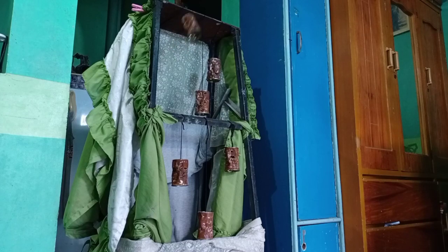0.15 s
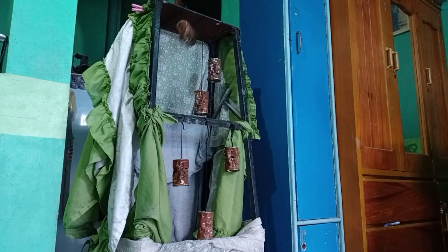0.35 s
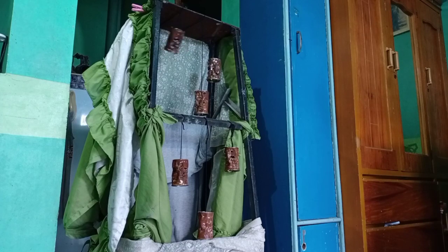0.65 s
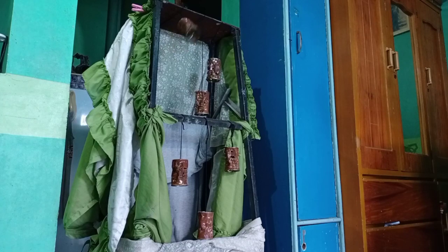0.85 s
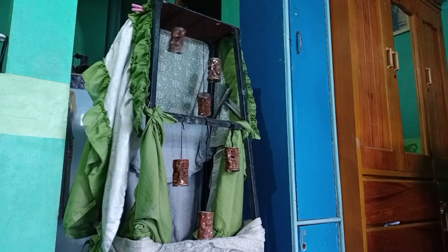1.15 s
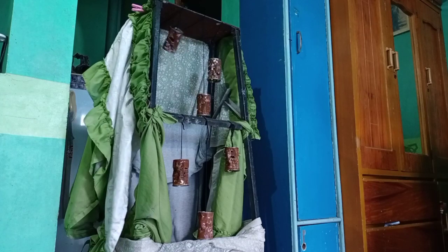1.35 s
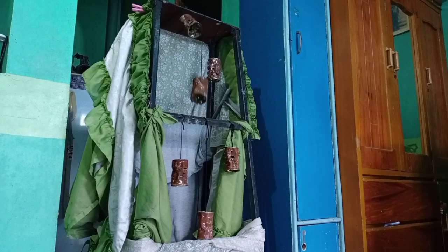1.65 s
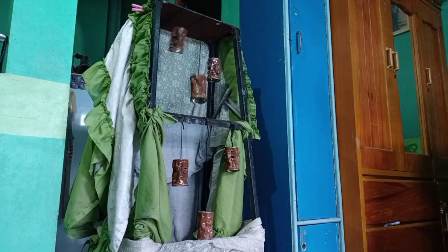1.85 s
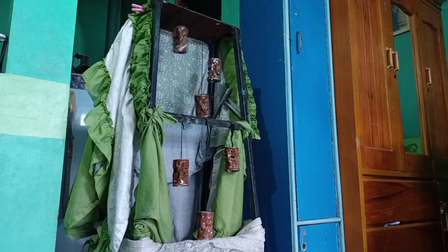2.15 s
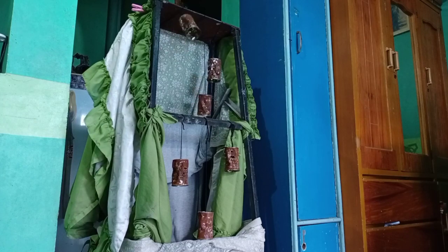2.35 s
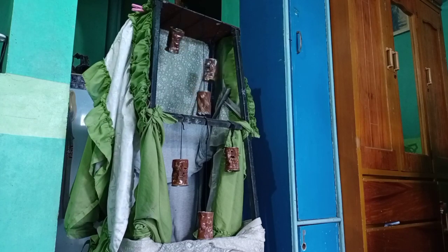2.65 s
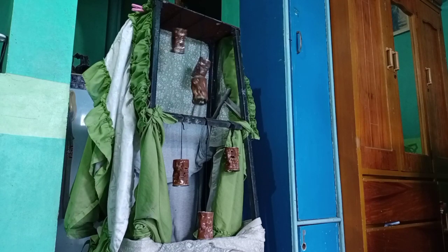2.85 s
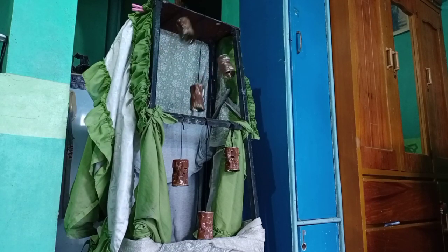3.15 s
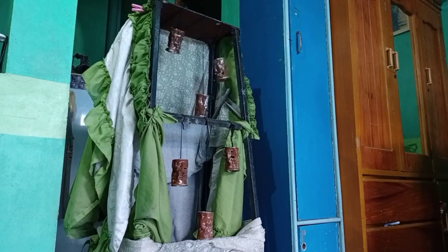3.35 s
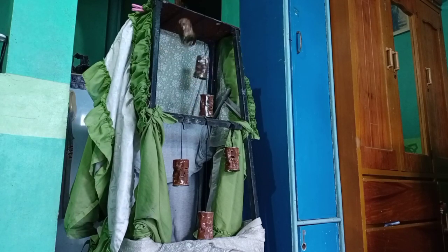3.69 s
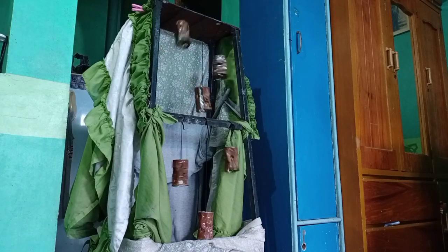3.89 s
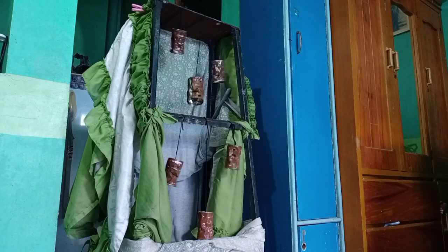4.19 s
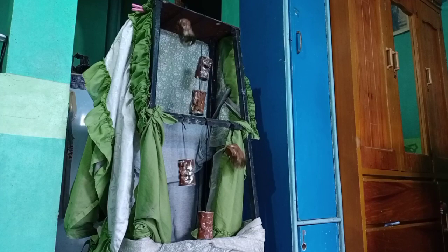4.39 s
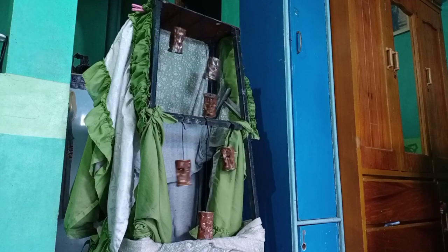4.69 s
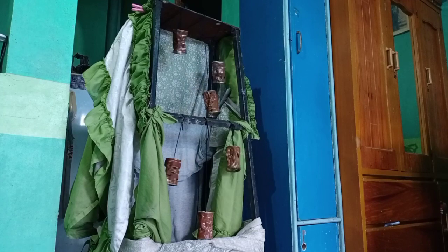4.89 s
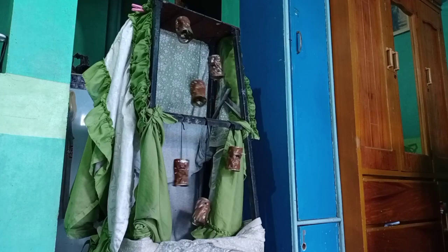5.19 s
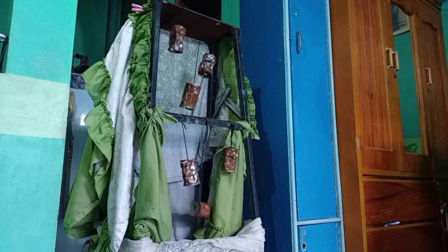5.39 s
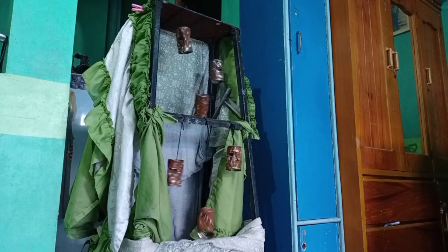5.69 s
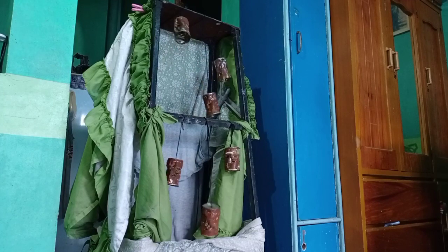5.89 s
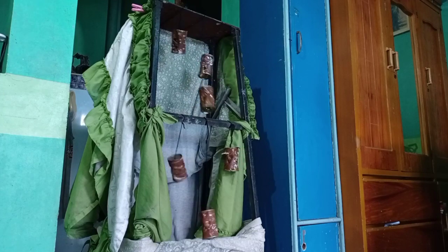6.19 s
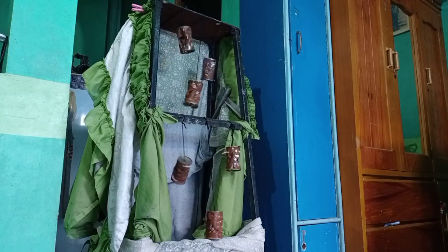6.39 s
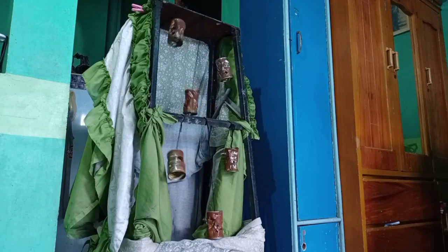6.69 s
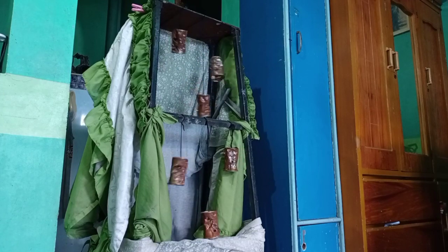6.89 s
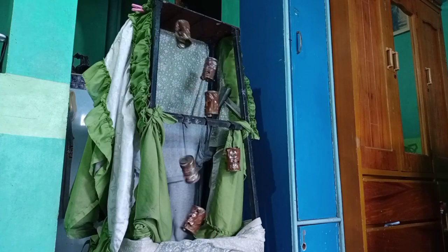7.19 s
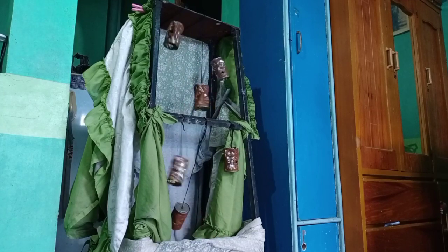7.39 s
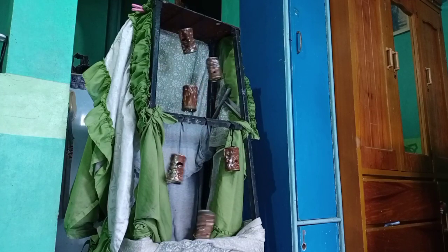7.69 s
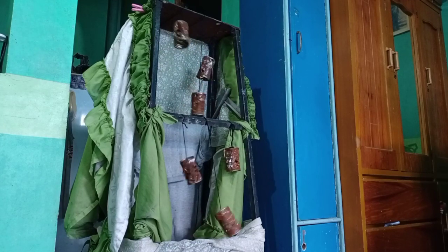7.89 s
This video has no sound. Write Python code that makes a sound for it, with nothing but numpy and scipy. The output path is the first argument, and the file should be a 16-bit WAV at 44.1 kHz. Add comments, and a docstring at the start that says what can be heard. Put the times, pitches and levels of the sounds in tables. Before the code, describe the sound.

A close gas pistol fires six snapping shots indoors, each with a metallic slide slam, hollow tin strikes and bright pellet bounces.

```python
"""In a small hard room a gas pistol fires six times, close by, at tin cans hung on strings.
The tail of an earlier shot opens the scene. Each shot is noise for the gas crack and the slide slam,
with pressure swings for the claps of the gun's parts. Struck cans are a dull blow plus beating tin modes;
bouncing pellets are treble ticks. Air, hum and rustle lie beneath, and sparse decaying taps make the room.
A limiter holds the room tail down after each bang, then lets it go."""
import sys
import numpy as np
from scipy import signal
from scipy.io import wavfile
from scipy.ndimage import uniform_filter1d, minimum_filter1d

SR = 44100
rng = np.random.default_rng(int(sys.argv[2]) if len(sys.argv) > 2 else 0)


def transcribe(signal):
    """Save signal, clipped to [-1, 1], as a 16-bit WAV file at the path in sys.argv[1]."""
    frames = np.atleast_2d(signal).T
    limited = np.clip(frames, -1, 1)
    pcm = np.round(limited * 32767).astype(np.int16)
    wavfile.write(sys.argv[1], SR, pcm)


N = 355005
LEAD = SR // 2  # samples rendered before the start, so the earlier shot can already be fading


def amp(db):
    """Decibels to gain."""
    return 10 ** (np.asarray(db) / 20)


def evened(x):
    """Scales to rms 1."""
    return x / np.sqrt(np.mean(x ** 2) + 1e-20)


def read(points, hz):
    """Reads a (Hz, value) table on a log-frequency axis."""
    f, value = np.transpose(points)
    return np.interp(np.log(hz + 1), np.log(f + 1), value)


def add(mix, s, sound):
    """Mixes a sound in at second s, cut off at the end of the scene."""
    part = mix[LEAD + round(s * SR):][:len(sound)]
    part += sound[:len(part)]


def colour(x, tone):
    """Minimum-phase filter with the gain of a (Hz, dB) table: nothing sounds before its cause."""
    hz = abs(np.fft.fftfreq(8192, 1 / SR))
    log_gain = np.log(amp(np.maximum(read(tone, hz), -100)))
    spectrum = np.exp(np.conj(signal.hilbert(log_gain)))
    taps = np.fft.ifft(spectrum).real[:4096]
    return signal.oaconvolve(x, taps)[:len(x)]


def band(x, lo_hz, hi_hz, order=2):
    """Band-pass, its upper edge kept below half the sample rate."""
    edges = [lo_hz, min(hi_hz, SR / 2.1)]
    return signal.sosfilt(signal.butter(order, edges, "bandpass", fs=SR, output="sos"), x)


def burst(t60, rise=0.00027):
    """Noise that starts fast (rise in s) and dies away by 60 dB in t60 seconds."""
    t = np.arange(6000) / SR
    return rng.standard_normal(6000) * (1 - np.exp(-t / rise)) * amp(-60 * t / t60)


def push(width):
    """One pressure swing out and back, crossing zero after twice the width in seconds."""
    u = np.arange(2000) / (SR * width)
    return u * (2 - u) * np.exp(1 - u)


def click(lo_hz, hi_hz, t60, order=1):
    """One hard contact: an impulse with a wisp of noise, band-passed, peak 1."""
    x = 0.26 * burst(t60, rise=.0001)
    x[0] = 1
    x = band(x, lo_hz, hi_hz, order=order)
    return x / abs(x).max()


# Spectrum of the room air. Each row: frequency in Hz, gain in dB.
AIR_TONE = [(50, 11), (150, 11), (400, 7), (1000, -7), (3000, 1), (8000, -14), (16000, -14)]


def air():
    """Broad coloured noise whose level wavers slowly by a couple of dB."""
    noise, slow = rng.standard_normal((2, N + LEAD))
    level_db = -48.5 + 2.0 * evened(uniform_filter1d(slow, 3000))
    return amp(level_db) * evened(colour(noise, AIR_TONE))


# Bands of the wavering hum. Each row: centre in Hz, width in Hz, level in dB.
HUM_BANDS = [(160, 43, -53), (271, 69, -50.5)]


def hum():
    """Narrow noise bands; their narrowness makes the hum waver."""
    noise = rng.standard_normal(N + LEAD)
    return sum(amp(db) * evened(band(noise, hz - width / 2, hz + width / 2, order=1))
               for hz, width, db in HUM_BANDS)


# Swell of the soft rustle. Each row: time in seconds, level in dB.
RUSTLE_SWELL = [(2.999, -41.5), (3.5, -46), (3.95, -41.5), (4.55, -39.5), (5.1, -47), (5.5, -50.5),
                (6.1, -42), (6.5, -72), (7.6, -43), (7.95, -55)]
# Spectrum of the rustle. Each row: frequency in Hz, gain in dB.
RUSTLE_TONE = [(200, -1.5), (500, -10), (1200, -15), (1570, -3.5), (1850, -2.5), (2050, -7), (3200, -1.5),
               (5000, -16.5), (9000, -22)]


def rustle():
    """Coloured noise made grainy by quick random level changes, coming and going."""
    noise, grain = rng.standard_normal((2, N + LEAD))
    grain_db = 0.97 * evened(uniform_filter1d(grain, 300))
    grainy = evened(colour(noise * amp(grain_db), RUSTLE_TONE))
    t = (np.arange(N + LEAD) - LEAD) / SR
    s, db = np.transpose(RUSTLE_SWELL)
    return grainy * amp(np.interp(t, s, db, -90, -90))


# How fast the room dies away. Each row: frequency in Hz, t60 in seconds.
ROOM_DECAY = [(100, 0.55), (350, 0.38), (1000, 0.45), (3000, 0.44), (8000, 0.37), (15000, 0.28)]


def room(x):
    """Sparse taps of random sign, each band dying at its own speed, over a fainter and slower late tail."""
    taps = np.zeros(SR)
    at = np.arange(200, SR - 12, 12)  # one tap somewhere in every 12 samples
    taps[at + rng.integers(0, 12, len(at))] = rng.choice([-1., 1.], len(at))
    hz, t, z = signal.stft(taps, SR, nperseg=256)
    fade_db = -60 * t / read(ROOM_DECAY, hz)[:, None]
    late_db = -28.5 + 0.43 * fade_db
    tail = signal.istft(z * (amp(fade_db) + amp(late_db)), SR, nperseg=256)[1]
    return signal.fftconvolve(x, tail / np.linalg.norm(tail))[:len(x)]


TICK_HZ, SPLIT_HZ = 7060, 11000  # a tick's lowest pitch, and where its topmost treble begins
# Pellets bouncing on hard ground.
# Each row: start in seconds, peak in dB, topmost treble in dB against that peak.
BOUNCES = [(.136, -28, 13.5), (0.293, -25, 2), (0.338, -30, 6), (1.27, -15.5, 6), (1.717, -43.5, 15),
           (2.049, -37, 6), (2.302, -39, 8), (2.493, -22.5, 3), (3.21, -33.5, 22), (4.366, -23.5, -5),
           (5.539, -40, 13), (5.969, -30, 11), (6.006, -31, 9), (6.349, -6.5, 7.5), (6.451, -12.5, 9.5),
           (6.943, -33.5, 4), (7.06, -17, -1), (7.39, -14, 12), (8.014, -28, 13)]


def pellets():
    """Tiny hard contacts, all treble: a short tick and a longer sizzle at the very top."""
    out = np.zeros(N + LEAD)
    for s, db, top_db in BOUNCES:
        add(out, s, amp(db) * click(TICK_HZ, SPLIT_HZ, t60=0.0059, order=2))
        add(out, s, amp(db + top_db) * click(SPLIT_HZ, SR / 2, t60=0.021, order=2))
    return out


# Share of the ring time: cans that touch damp each other, a pellet lets one ring.
KNOCK_RING, STRIKE_RING = 0.3, 0.73
STRIKE_DB = -20  # a lowest mode above this level counts as a pellet strike
BLOW_WIDTH = 1.85  # a blow spans this factor either side of its colour
FALL_DB = 9.5  # modes above the blow's colour lose this many dB per octave
# Cans struck by a pellet or by another can. Each row: start in seconds, blow in dB,
# blow colour in Hz, lowest mode in dB, upper modes in dB, pitch of the lowest mode in Hz.
CAN_HITS = [(0.9498, -3.5, 3000, -29.5, -24, 1633), (.961, -2.5, 4230, -33, -30, 1630),
            (1.063, -9, 2000, -11, -19, 1307), (2.761, 6, 2030, -20, -22, 1785),
            (4.045, 2, 3230, -13.5, -5.5, 1723), (4.3636, -22, 1500, -60, -56, 1670),
            (4.367, -26, 260, -70, -60, 1700), (4.45, -37, 2800, -56, -39, 1790),
            (4.579, -33, 2480, -51, -27.5, 1700), (5.17, -21, 2000, -7.5, -28, 1739),
            (5.661, -26, 2280, -41, -33, 1670), (5.902, -39, 2500, -70, -55, 1700),
            (5.9632, -20, 1000, -37, -44, 1600), (6.0697, -28, 2730, -56, -30, 1695),
            (6.198, 1.5, 2140, -18.5, -11, 1634), (6.4505, -17, 4630, -56, -27, 2100),
            (7.052, -36, 3910, -70, -44, 2360), (7.271, -1, 2060, -6.5, -19, 1668),
            (7.568, -38, 3100, -47, -37, 1678), (7.704, -44, 2380, -53, -43, 1630),
            (7.815, -43, 2400, -58, -45, 1600), (8.016, -22.5, 3200, -65, -54, 1800)]
# Modes of a tin can. Each row: multiple of the lowest pitch, level in dB,
# t60 in seconds before the ring share.
CAN_MODES = [(1, 0, .45), (1.24, -5, .3), (1.335, -2, .25), (1.62, -3, .55), (1.865, -2, .3),
             (2.6, -2, .25), (2.865, -3, .35), (4.25, 0, .3), (5.85, -2, .2), (6.78, 0, .2)]


def cans():
    """A dull blow, then thin tin modes as close pairs that beat and waver: the can is dented and swings."""
    blows, rings = np.zeros((2, N + LEAD))
    t = np.arange(SR // 2)[:, None] / SR
    multiple, mode_db, t60 = np.transpose(CAN_MODES)
    for s, blow_db, colour_hz, low_db, upper_db, pitch_hz in CAN_HITS:
        spot_db, split, phase = rng.standard_normal((3, len(CAN_MODES)))
        mode_hz = multiple * pitch_hz
        waver = evened(uniform_filter1d(rng.standard_normal(len(t)), 500))[:, None]
        turn = 2 * np.pi * mode_hz * t + .45 * waver
        partner = np.sin(turn * (1 + .013 * (1 + .25 * split)) + phase)
        pair = np.sin(turn) + .4 * partner
        # where the blow lands weighs the modes
        db = np.where(multiple == 1, low_db, upper_db) + mode_db + spot_db
        db -= FALL_DB * np.maximum(np.log2(mode_hz / colour_hz), 0)
        ring = STRIKE_RING if low_db > STRIKE_DB else KNOCK_RING
        add(rings, s, (pair * amp(db - 60 * t / (t60 * ring))).sum(1))
        blow = click(colour_hz / BLOW_WIDTH, colour_hz * BLOW_WIDTH, t60=0.0088, order=3)
        add(blows, s, amp(blow_db) * blow)
    return blows, rings


SLIDE_S = .040  # the slide slams home this long after the crack
# The shots, the first one already fading. Each row: start in seconds, gas crack in dB,
# slide slam in dB, low push in dB, clatter after the slam in dB.
SHOTS = [(-.265, 14, 10.5, -6.5, 0), (0.9963, 8, 13, -1, -0.5), (2.6962, 6, 10, -8, -19),
         (3.9816, 7.5, 10, -4, 2), (5.1059, 7.5, 10, -5, 1), (6.1337, 8.5, 12, -7.5, -22),
         (7.2178, 6.5, 10, -7, -1)]
# Spectrum of the bangs that fill the room. Each row: frequency in Hz, gain in dB.
BANG_TONE = [(60, -11), (170, -3), (345, 11.5), (550, 0.5), (1000, -2.5), (3000, 5), (8000, 0),
             (16000, -0.5)]


def bangs():
    """What the gun sends into the room: one coloured impulse for each crack and each slam."""
    out = np.zeros(N + LEAD)
    for s, crack_db, slam_db, _, _ in SHOTS:
        add(out, s, amp([crack_db]))
        add(out, s + SLIDE_S, amp([slam_db - 5.5]))
    return colour(out, BANG_TONE)


def rattle(t60, per_s=1500):
    """A dense run of suction spikes of uneven size, dying away."""
    t = np.arange(3000) / SR
    chance, size = rng.random((2, 3000))
    spikes = (chance < per_s / SR) * (0.2 + size) * amp(-60 * t / t60)
    return -signal.oaconvolve(spikes, push(.00011))


# Claps and first echoes after the crack, alike in every shot. Each row: seconds after the crack,
# level in dB against the crack, low thud in dB against the clap.
CRACK_CLAPS = [(.0008, 10, -1.5), (.0045, 11, -4.5), (.0075, 13.5, -12), (.011, 8.5, -5.5), (.0155, 8, -1),
               (.022, 11, -0.5), (0.027, 1.5, 8)]
# The same after the slam; all but the first follow the clatter. Each row: seconds after the slam,
# level in dB against the slam, low thud in dB against the clap.
SLAM_CLAPS = [(0, 10, -8.5), (.006, 7.5, -19), (.010, -1, 5), (.016, -1.5, -1), (.0225, 0, 0.5),
              (.0285, -7.5, -0.5)]


def claps():
    """The gun's parts clap: a suction swing with a splinter of noise, then a slower outward thud."""
    out = np.zeros(N + LEAD)
    for shot, crack_db, slam_db, _, clatter_db in SHOTS:
        one_round = [(after, crack_db + db, thud_db) for after, db, thud_db in CRACK_CLAPS]
        for k, (after, db, thud_db) in enumerate(SLAM_CLAPS):
            one_round.append((SLIDE_S + after, slam_db + db + clatter_db * (k > 0), thud_db))
        for after, db, thud_db in one_round:
            # each clap strays a little in time (s) and level (dB) from shot to shot
            s = shot + after + .0007 * rng.uniform(-1, 1)
            db = db + 2.5 * rng.standard_normal()
            splinter = band(burst(.01), 600, 4500)[:2000]
            suction = push(rng.uniform(.00008, 0.00039))
            add(out, s, amp(db) * (0.42 * splinter - 0.75 * suction))
            add(out, s + 0.00094, amp(db + thud_db) * push(0.0011))
    return out


# Spectrum of the crack and slam noise. Each row: frequency in Hz, gain in dB.
CRACK_TONE = [(60, 6), (300, 3.5), (1000, -1.5), (3000, 18), (8000, -2), (13000, -7), (16000, 11)]


def pistol():
    """Gas crack and slide slam: noise bursts, each with rattling parts and a low rumble."""
    near, parts = np.zeros((2, N + LEAD))
    for s, crack_db, slam_db, low_db, _ in SHOTS:
        slam_s = s + SLIDE_S
        add(near, s, amp(crack_db) * burst(t60=0.096))
        add(near, slam_s, amp(slam_db) * burst(t60=0.015))
        add(parts, s, amp(crack_db + 8.0) * rattle(t60=0.12))
        add(parts, slam_s, amp(slam_db + 7.0) * rattle(t60=0.086))
        for start in (s, slam_s):
            rumble = evened(band(burst(0.065, rise=0.00032), 70, 335))
            add(near, start, amp(low_db) * rumble)
    return colour(near, CRACK_TONE) + parts


def scene():
    """Background, pellets, cans and gun, with the room around them; both channels alike."""
    background = air() + hum() + rustle()
    ticks = pellets()
    blows, rings = cans()
    wet = room(amp(28.0) * bangs() + amp(5.5) * blows + amp(-5) * rings + amp(1.0) * ticks)
    mix = background + wet + ticks + blows + rings + claps() + pistol()
    return np.tile(mix[LEAD:], (2, 1))


# Colour of the microphone. Each row: frequency in Hz, gain in dB.
MICROPHONE = [(24, -86), (40, -24), (114, -9.5), (188, -12.5), (334, -10.5), (623, -3), (906, -1.5),
              (1350, -1), (1920, -1.5), (2070, -2.5), (6350, -14), (8150, -2.5), (10700, -18.5),
              (14100, -10), (15600, -12)]


def record(dry):
    """Microphone colour, a limiter that looks ahead, holds and recovers steadily, soft overload, band limit."""
    x = colour(dry[0], MICROPHONE)
    power_db = 10 * np.log10(abs(uniform_filter1d(x ** 2, 200)) + 1e-12)
    held_db = -minimum_filter1d(-power_db, 1300, origin=100)  # loudest from 17 ms behind to 12 ms ahead
    cut_db = np.clip(held_db + 15, 0, 20)  # starts at -15 dB, cuts 20 dB at most
    recovery = np.arange(N) * 112. / SR  # 112 dB a second
    cut_db = np.maximum.accumulate(cut_db + recovery) - recovery
    limited = x / amp(uniform_filter1d(cut_db, 700))
    soft = 0.97 * np.tanh(limited / .95)
    low_pass = signal.firwin(511, 15700, window=("kaiser", 9), fs=SR)
    return np.tile(signal.oaconvolve(soft, low_pass, "same"), (2, 1))


dry = scene()
out = record(dry)
transcribe(out)
```